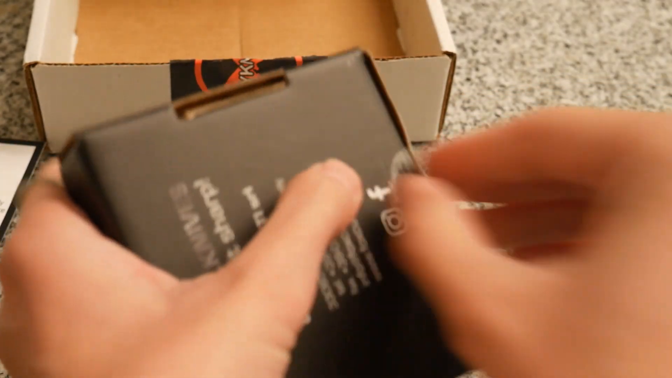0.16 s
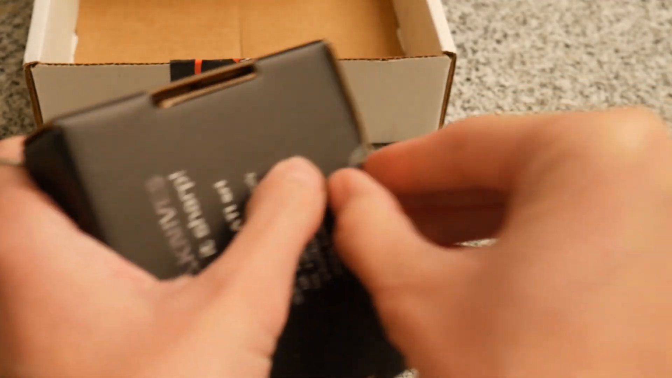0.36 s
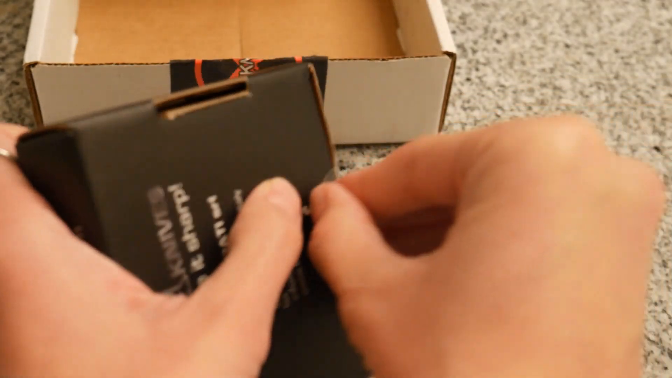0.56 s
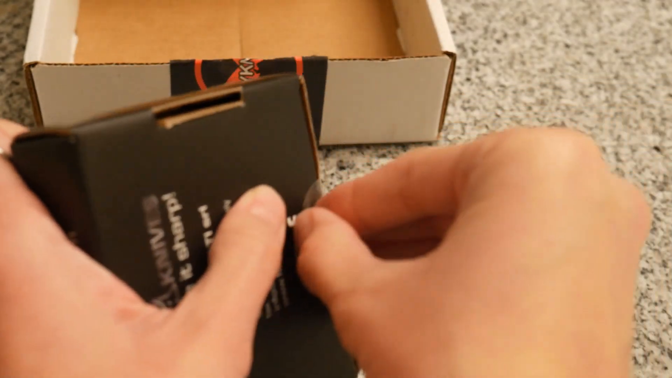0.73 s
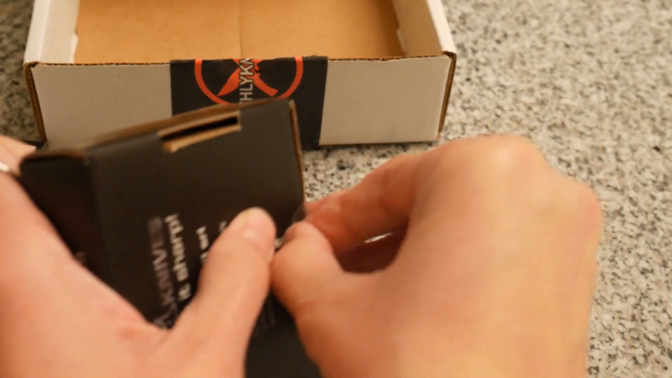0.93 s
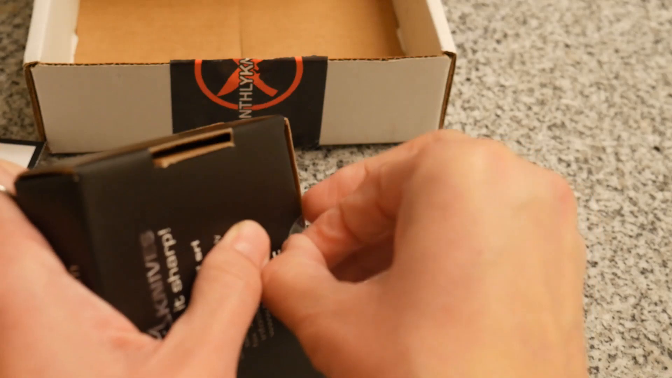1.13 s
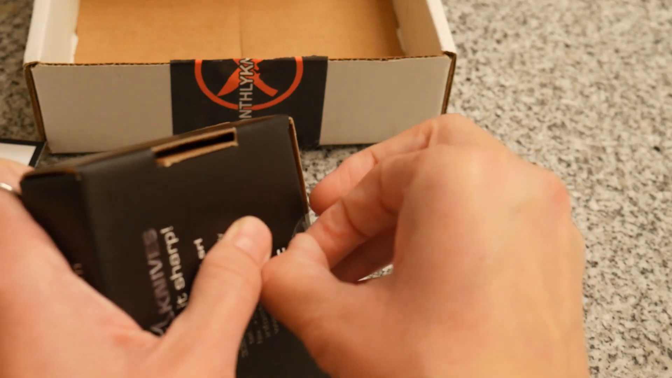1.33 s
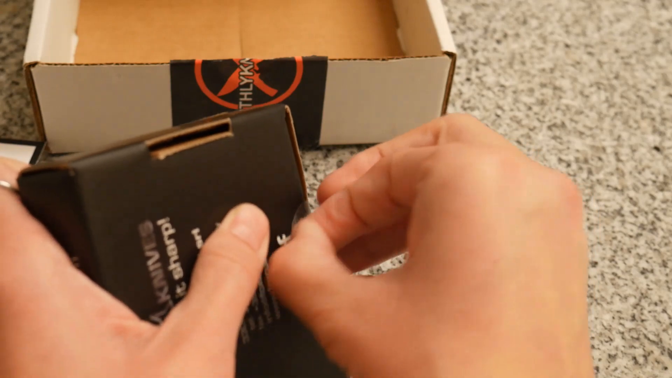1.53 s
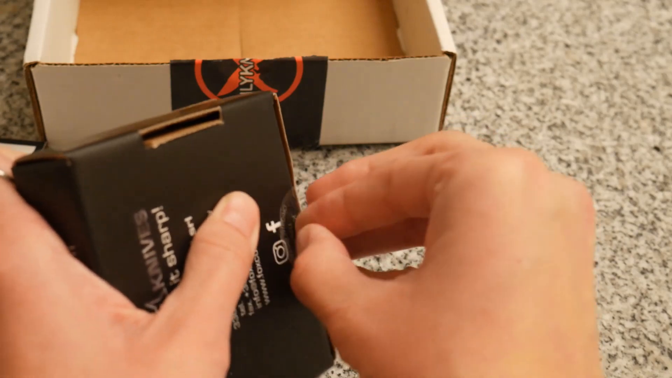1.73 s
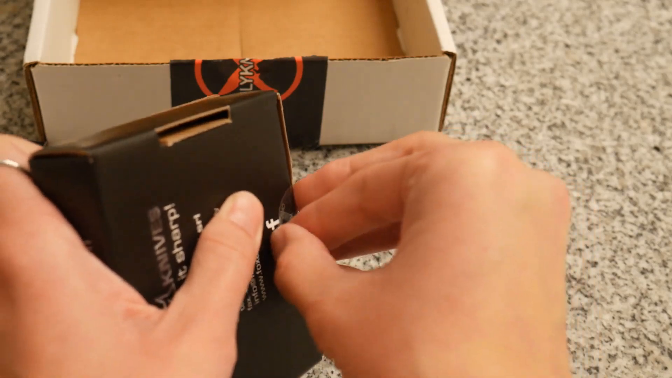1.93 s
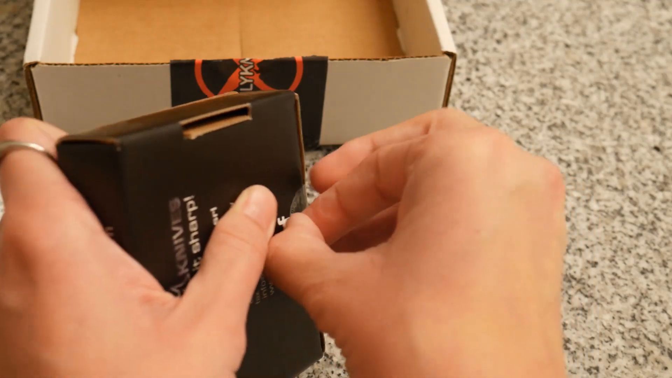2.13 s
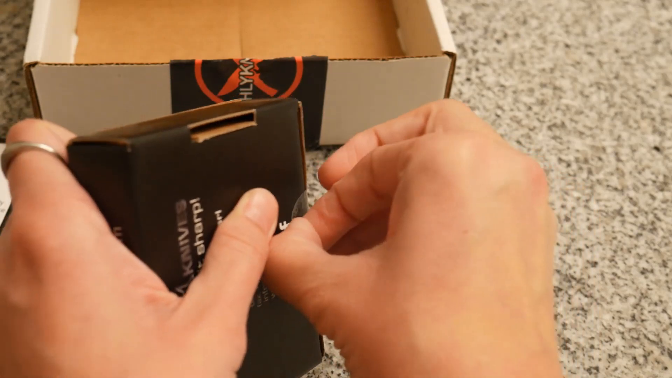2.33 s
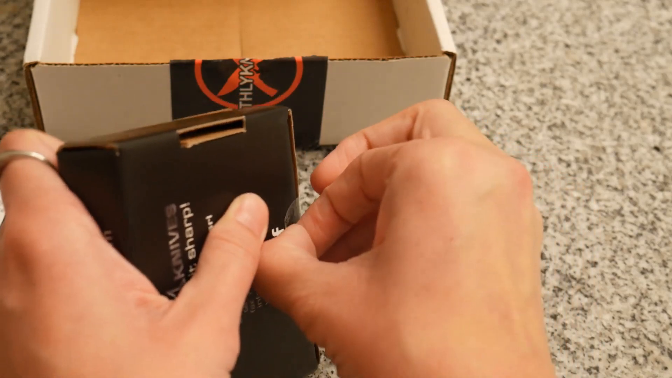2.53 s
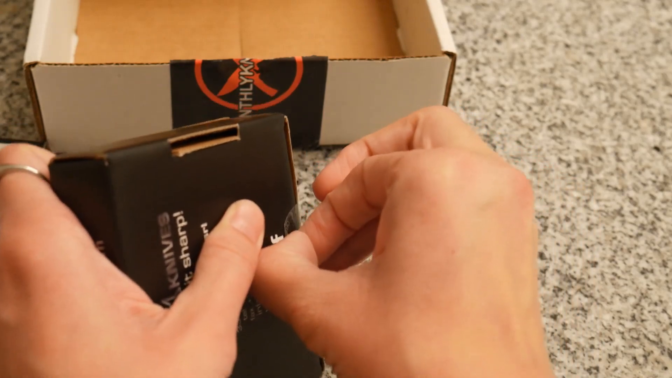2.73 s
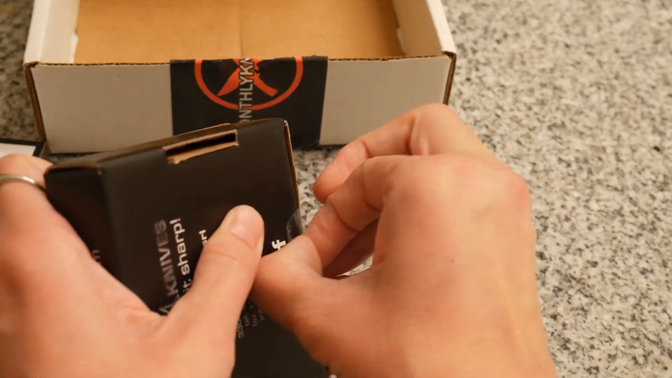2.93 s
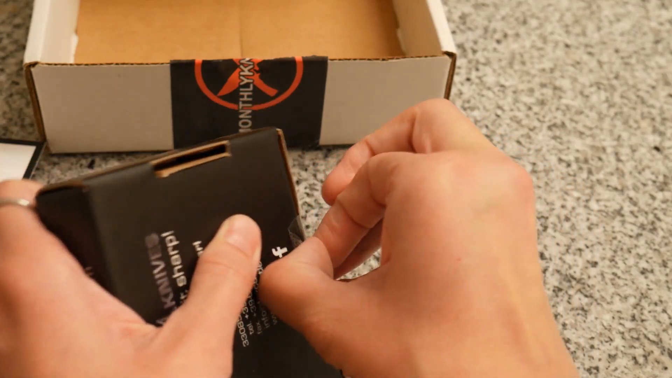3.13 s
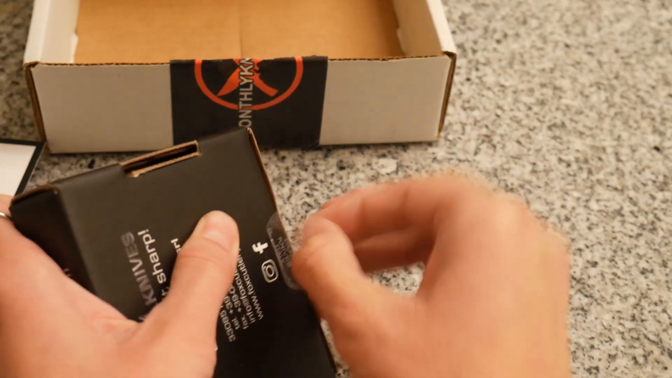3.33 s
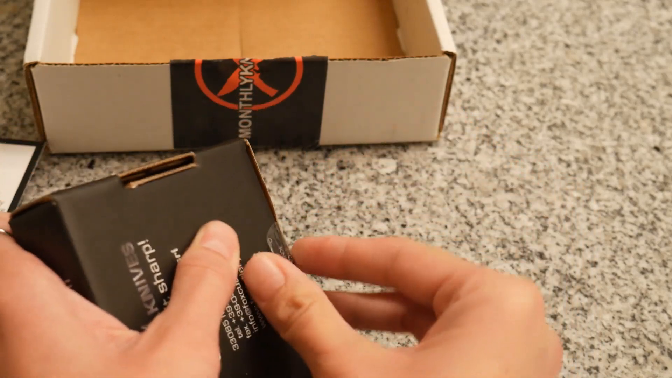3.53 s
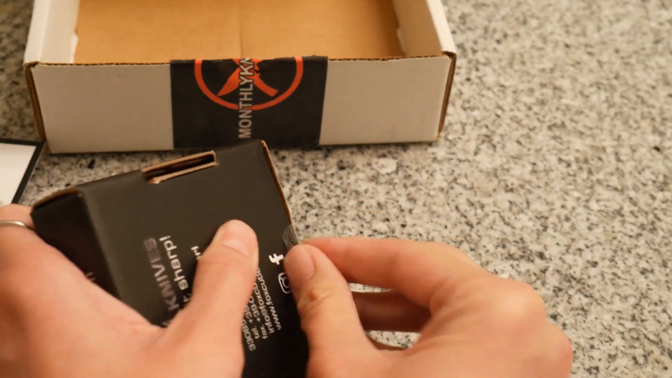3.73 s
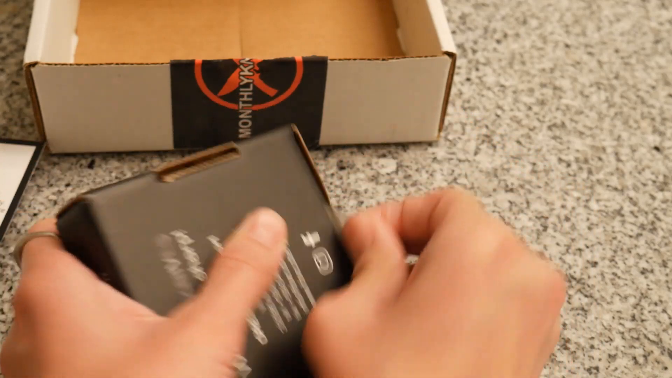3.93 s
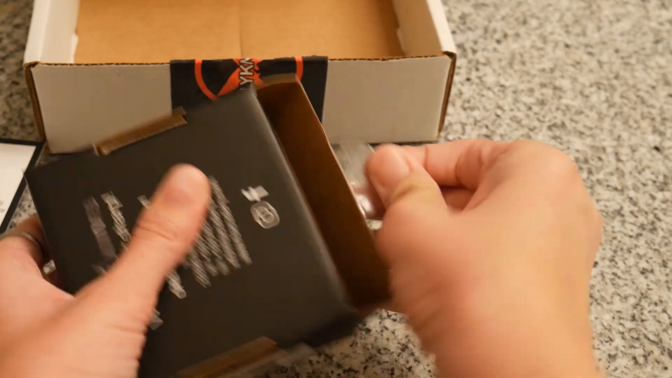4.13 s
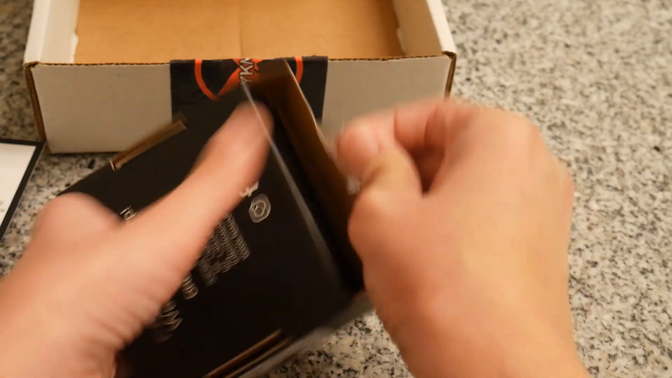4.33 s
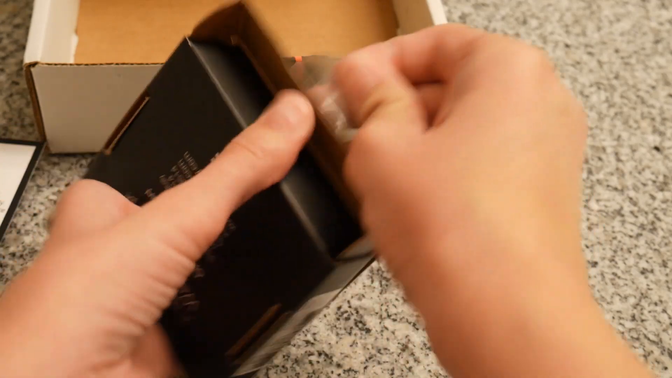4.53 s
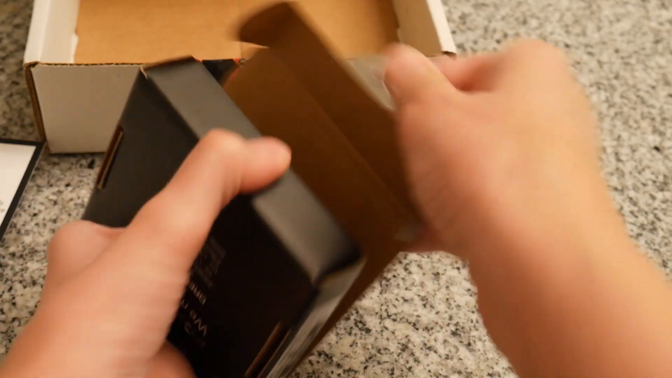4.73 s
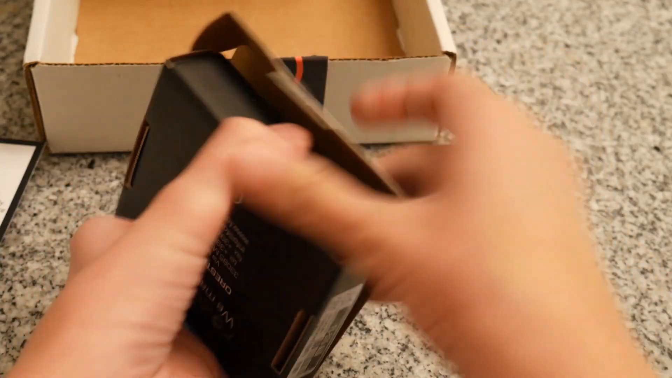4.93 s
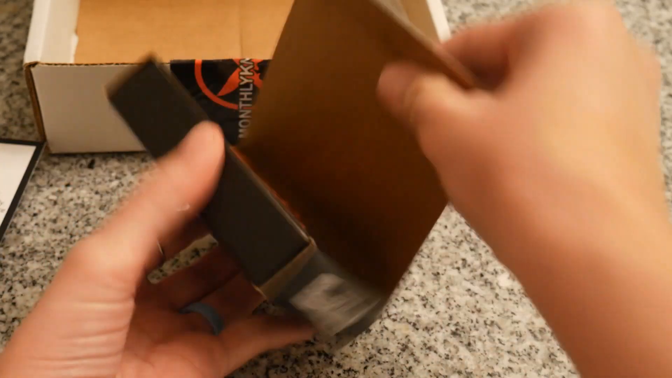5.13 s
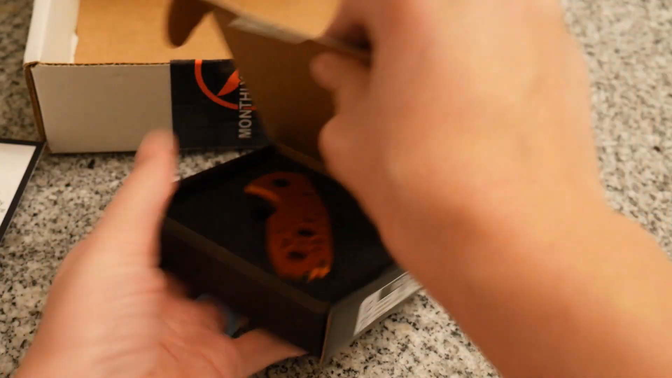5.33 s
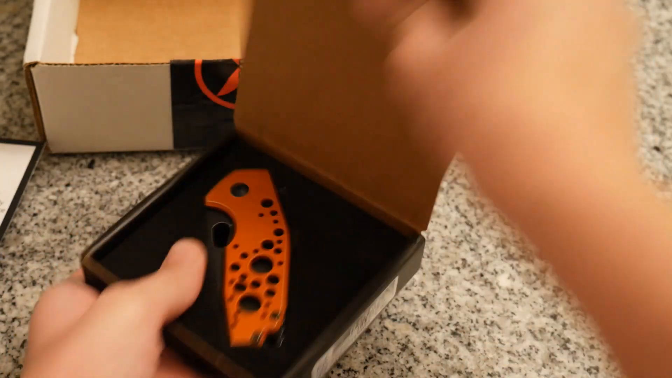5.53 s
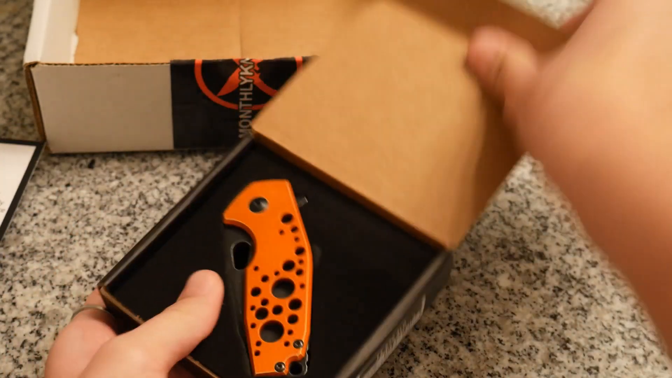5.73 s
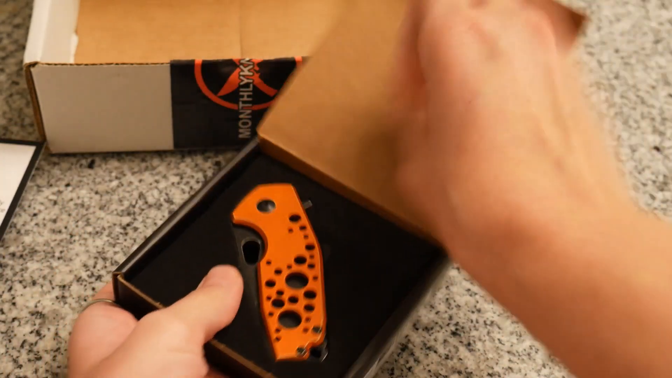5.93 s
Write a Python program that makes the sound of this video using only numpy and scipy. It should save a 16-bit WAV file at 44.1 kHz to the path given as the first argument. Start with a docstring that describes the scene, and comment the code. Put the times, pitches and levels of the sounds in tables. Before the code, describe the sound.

Fingers rub and pick at a small cardboard box's plastic seal, then the flap snaps loose and the lid scrapes open.

```python
"""In a small live room, close over a stone counter, hands work open a little cardboard box.
Fingertips rub and pick at its plastic seal: stick-slip friction rasps, hisses and creaks.
The flap pops out with sharp snaps and scrapes free, the hollow box knocks as it is turned over,
and the lid rasps as it is folded back. Contacts and rubbing are coloured by the resonances of the
card; the counter returns one early reflection and the room a short reverberation."""
import sys
import numpy as np
from scipy import signal
from scipy.fft import rfft, irfft, next_fast_len
from scipy.io import wavfile
from scipy.ndimage import uniform_filter1d

SR = 44100
rng = np.random.default_rng(int(sys.argv[2]) if len(sys.argv) > 2 else 0)


def dump(signal):
    """Clip the signal to [-1, 1] and save it as 16-bit WAV at the path in sys.argv[1]."""
    limited = np.clip(np.atleast_2d(signal).T, -1, 1)
    pcm = np.round(limited * 32767).astype(np.int16)
    wavfile.write(sys.argv[1], SR, pcm)


N = 267564
TIME = np.arange(N) / SR


def from_db(db):
    """Amplitude ratio of a level in decibels."""
    return 10 ** (np.asarray(db) / 20)


def unit_rms(x):
    """Normalisation to unit mean power."""
    return x / np.sqrt(np.mean(x ** 2) + 1e-20)


def at_hz(points, hz):
    """Interpolation of (frequency [Hz], value) points on a logarithmic frequency axis."""
    points = np.array(points)
    return np.interp(np.log(np.maximum(hz, 1)), np.log(points[:, 0]), points[:, 1])


def band(x, low_hz, high_hz, order=2):
    """Causal Butterworth band-pass filtering."""
    return signal.sosfilt(signal.butter(order, [low_hz, high_hz], "band", fs=SR, output="sos"), x)


def drift(knots_per_s):
    """Slow random modulation: linear interpolation between Gaussian values."""
    knots = rng.standard_normal(N // 20)
    return np.interp(TIME * knots_per_s, np.arange(len(knots)), knots)


def whiten(x, width_hz):
    """Spectral whitening: ripples broader than width_hz are levelled, the fine structure stays."""
    spectrum, size = rfft(x), x.shape[-1]
    power = uniform_filter1d(np.abs(spectrum) ** 2, max(1, int(width_hz * size / SR)), axis=-1)
    flat = irfft(spectrum / np.sqrt(np.maximum(power, 1e-12)), size)
    return flat * (np.arange(size) < size / 2)


def gliding_resonance(x, hz, relative_width, block=512):
    """A two-pole resonator of constant Q, retuned block by block."""
    out, state = np.zeros(N), np.zeros(2)
    for i in range(0, N, block):
        angle = 2 * np.pi * hz[i] / SR
        radius = np.exp(-relative_width * angle / 2)
        forward = (1 - radius ** 2) / 2 * np.array([1, 0, -1])
        feedback = [1, -2 * radius * np.cos(angle), radius ** 2]
        out[i:i + block], state = signal.lfilter(forward, feedback, x[i:i + block], zi=state)
    return out


def stereo_spectrum(correlation, size):
    """Partial coherence: the spectrum of two white noises mixed from a mid and a side signal."""
    alike = np.clip(at_hz(correlation, np.fft.rfftfreq(size, 1 / SR)), 0, 1)
    mid, side = rfft(rng.standard_normal((2, size)))
    return np.sqrt(1 + alike) * mid + np.sqrt(1 - alike) * side * [[1], [-1]]


def background(level_db=-63):
    """Stationary coloured noise: the murmur of the room and the hiss of the microphone."""
    # noise floor: (frequency [Hz], relative spectral density [dB])
    density = [(15, -48), (25, -18), (87, -20), (105, -5.5), (161, -7.5), (416, -9), (476, -14.5),
               (560, -14.5), (624, -13.5), (1740, -19.5), (2280, -18.5), (2690, -21.5), (7710, -26.5),
               (14800, -30.5), (16000, -48)]
    # its left-right likeness: (frequency [Hz], correlation [0-1])
    correlation = [(40, 0.6), (130, 0), (350, 0), (1500, 0), (8000, 0.34)]
    size = next_fast_len(N)
    colour = from_db(at_hz(density, np.fft.rfftfreq(size, 1 / SR)))
    noise = irfft(stereo_spectrum(correlation, size) * colour, size)[:, :N]
    return from_db(level_db) * unit_rms(noise)


def room(x, build_s=0.0029, late_s=0.148, late_db=-25, late_decay_s=0.006, size=32768):
    """Reverberation: reflections build up and decay exponentially; a faint cluster returns late."""
    # decay by band: (frequency [Hz], reverberation time [s], reflected level [dB])
    bands = [(130, 0.99, 0.5), (400, 0.33, 1), (1000, 0.24, -0.5), (2860, 0.26, -2.5), (7400, 0.28, -1),
             (13400, 0.16, -2)]
    # left-right likeness of the reflections: (frequency [Hz], correlation [0-1])
    correlation = [(120, 0), (260, 0.84), (500, 0.46), (1000, 0.36), (4000, 0.62), (12000, 0.38)]
    t = np.arange(size) / SR
    hz = np.fft.rfftfreq(size, 1 / SR)
    centres = np.array(bands)[:, 0]
    noise = irfft(stereo_spectrum(correlation, size), size)
    late = (t > late_s) * from_db(late_db) * np.exp(-np.abs(t - late_s) / late_decay_s)
    build = 1 - np.exp(-(t / build_s) ** 2)
    response = 0
    for (_, t60, db), share in zip(bands, np.eye(len(bands))):
        tail = whiten(noise * build * np.hypot(from_db(-60 * t / t60), late), width_hz=102)
        crossfade = at_hz(np.c_[centres, share], hz)
        response = response + from_db(db) * rfft(tail) * crossfade
    return signal.fftconvolve(x[None], irfft(response, size)[:, :size // 2], axes=1)[:, :N]


def counter_echo(x, delay_s=0.0088, echo_db=-13):
    """Specular reflection: the hard counter returns one delayed, weaker copy."""
    return from_db(echo_db) * np.interp(TIME - delay_s, TIME, x, left=0)


def box_body(x):
    """Resonance and antiresonance: the card filters each excitation with the same peaks and dips."""
    # response of the box and its card: (frequency [Hz], bandwidth [Hz], gain [dB])
    resonances = [(123.7, 22, 12.5), (268, 18, 5), (323, 36, 4), (403, 80, 3.5), (633, 160, 1.5),
                  (811, 220, 4.5), (966, 26, 6), (1070, 81, -1.5), (1240, 62, 0.5), (1270, 220, -2),
                  (1390, 6.6, 5), (1500, 15, 6), (1640, 22, 2), (1760, 180, -1.5), (2280, 180, 2),
                  (2844, 280, 4.5), (3080, 160, -0.5), (4340, 230, -1.5), (6100, 4800, 2.5), (7200, 220, 1),
                  (8100, 80, -1), (9730, 2300, 4.5), (14800, 6600, -4)]
    sections = []
    for hz, width_hz, db in resonances:
        damping, lift = np.pi * width_hz / SR, from_db(db / 2)
        tuning = -2 * np.cos(2 * np.pi * hz / SR)
        forward = [1 + damping * lift, tuning, 1 - damping * lift]
        feedback = [1 + damping / lift, tuning, 1 - damping / lift]
        sections.append(np.array(forward + feedback) / feedback[0])
    return signal.sosfilt(sections, x + 1e-18)


def shut_box(x, open_at_s=4.17, opening_s=0.15):
    """Enclosure resonance: the closed box adds a ring to every touch, fading as the flap comes out."""
    # modes of the closed box: (frequency [Hz], bandwidth [Hz], gain [dB])
    modes = [(437, 38, 0.5), (906, 28, 1), (1640, 28, -4), (2300, 140, -4)]
    drive = x * np.clip((open_at_s - TIME) / opening_s, 0, 1) + 1e-18
    return x + sum(from_db(db) * signal.lfilter(*signal.iirpeak(hz, hz / width_hz, fs=SR), drive)
                   for hz, width_hz, db in modes)


def squeaks():
    """Stick-slip oscillation: uneven slips lock loosely onto one resonance, swell and let go."""
    # creaks of skin, seal and card:
    # (start [s], duration [s], frequency [Hz], relative half-bandwidth [ratio], level [dB])
    creaks = [(0.374, 0.14, 830, 0.079, -58), (.42, 0.098, 2420, 0.25, -57),
              (0.901, 0.072, 3660, .08, -66.5), (1.03, .07, 4430, 0.075, -67.5),
              (1.152, .03, 5070, 0.24, -55.5), (1.783, 0.039, 2900, 0.13, -50.5),
              (2.854, 0.21, 2300, 0.054, -77), (3.657, 0.031, 1600, .05, -50),
              (3.692, 0.054, 1600, 0.048, -68), (4.217, 0.047, 3800, 0.18, -30.5),
              (4.68, 0.034, 5000, 0.074, -25), (4.83, .16, 1320, .17, -43), (5.789, 0.11, 1000, 0.37, -38),
              (6.016, 0.09, 1436, 0.054, -33.5)]
    out = np.zeros(N + SR)
    for start_s, length_s, hz, spread, db in creaks:
        at, span = int(start_s * SR), int(length_s * SR)
        slips = rng.standard_normal(SR // 2)
        tone = band(slips, hz / (1 + spread), hz * (1 + spread))[-span:]
        out[at:at + span] += from_db(db) * unit_rms(tone) * np.hanning(span)
    return out[:N]


def stroke_envelope(start_s, length_s, attack_share=0.34, release_s=0.01):
    """Amplitude envelope of a stroke: linear rise, hold, then exponential decay."""
    t = TIME - start_s
    rise = np.clip(t / (attack_share * length_s), 0, 1)
    return rise * np.exp(-np.clip((t - length_s) / release_s, 0, 20))


def hand_motion(firm_db=-44.5, expansion=1.29, pad_hz=950, pad_flex_db=-3, flex_db_per_octave=-31.5):
    """Incoherent sources add in power: grip and strokes set four friction gains and the rasp pitch."""
    # the holding hand flexes the box: (time [s], level before expansion [dB])
    grip_levels = [(0.0, -64), (0.25, -73), (0.44, -67.5), (0.89, -58), (1.21, -75), (2.07, -62.5),
                   (2.41, -94), (3.12, -89), (3.34, -68), (3.88, -64.5), (4.15, -55), (4.42, -51.5),
                   (4.84, -52.5), (5.35, -52), (5.59, -58.5), (5.81, -63), (5.94, -58), (6.06, -57)]
    # skin and card slide on the box: (start [s], duration [s], relative rasp level [dB],
    # rasp frequency [Hz], relative hiss level [dB], fine over coarse hiss [dB])
    strokes = [(0, 0.048, -65, 1470, -65, -9), (0.137, 0.038, -64.5, 1800, -61.5, -4),
               (0.374, 0.13, -53, 980, -59, -12), (0.717, 0.017, -58, 900, -61, -22),
               (0.786, 0.1, -64, 1000, -66, -19), (0.984, 0.15, -77, 1210, -67, -12),
               (1.146, 0.022, -64, 1490, -58, -5), (1.782, 0.022, -57.5, 1700, -50, -18),
               (1.875, 0.14, -58, 1100, -61, -15), (2.857, 0.22, -69, 1350, -65, -1),
               (2.965, 0.028, -65, 1370, -58, 8), (3.306, 0.062, -65, 1310, -62.5, 2),
               (3.44, .04, -55, 1100, -63.5, -7), (3.548, 0.1, -59, 1230, -54.5, -9),
               (3.629, 0.1, -53.5, 1640, -61.5, -9), (3.774, 0.15, -55, 1610, -49.5, -2),
               (3.93, 0.26, -50.5, 1000, -49.5, -1), (4.363, 0.04, -39.5, 1240, -34, -14),
               (4.417, .09, -44.5, 1320, -52, 1), (4.707, .055, -42, 1400, -37, -5),
               (4.824, 0.066, -46, 1500, -49, -2), (4.904, 0.077, -46, 1500, -42, -1),
               (4.928, .24, -55, 1550, -47.5, 0.5), (5.373, 0.18, -57.5, 1420, -56, -5),
               (5.546, 0.11, -60, 1420, -47.5, 3), (5.741, 0.026, -43, 1270, -44.5, -2),
               (5.781, 0.11, -38, 1320, -43.5, -5), (5.864, 0.041, -34.5, 1230, -32, -6),
               (5.899, 0.12, -51, 1250, -47.5, -5.5), (6.019, 0.093, -42.5, 1380, -43, -4)]
    grip_db = np.interp(TIME, *np.transpose(grip_levels))
    grip = from_db(firm_db + expansion * (grip_db - firm_db))
    moves = [(grip, -3, 1250, -3, -8)]  # the gripping skin creeps on the card all the while
    moves += [(stroke_envelope(start_s, length_s), *colour) for start_s, length_s, *colour in strokes]
    flex = grip ** 2
    rasp = weighted_hz = coarse = fine = 0
    for envelope, rasp_db, hz, hiss_db, bright_db in moves:
        rasp_power = (envelope * from_db(rasp_db)) ** 2
        hiss_power = (envelope * from_db(hiss_db)) ** 2
        # a flat finger pad rasps low and flexes the box; an edge rasps high and hardly flexes it
        flex += rasp_power * from_db(pad_flex_db + flex_db_per_octave * np.log2(hz / pad_hz)) ** 2
        rasp += rasp_power
        weighted_hz += rasp_power * hz
        coarse_share = 1 / (1 + from_db(bright_db) ** 2)
        coarse += hiss_power * coarse_share
        fine += hiss_power * (1 - coarse_share)
    return np.sqrt(flex), np.sqrt(rasp), np.sqrt(coarse), np.sqrt(fine), weighted_hz / rasp


def friction(slips_per_s, spread_db, judder_db, judder_per_s):
    """Shot noise: fibres catch and slip at random, with uneven strength, and shake the box."""
    slips = (rng.random(N) < slips_per_s / SR) * rng.standard_normal(N)
    strength_db = spread_db * rng.standard_normal(N) + judder_db * drift(judder_per_s)
    return box_body(slips * from_db(strength_db))


def rubbing(flex_db=-4, sway_db=-15, rasp_db=-1, hiss_db=-2.5):
    """Sliding friction forces vibration: the box flexes, its panels rasp, its surface hisses."""
    flex_gain, rasp_gain, coarse_gain, fine_gain, rasp_hz = hand_motion()
    # shifting fingers give the box separate little bumps
    bumps = friction(slips_per_s=260, spread_db=1.7, judder_db=3.5, judder_per_s=45)
    hollow = unit_rms(band(bumps, 216, 533) + from_db(sway_db) * band(bumps, 82, 110))
    # the grip and the place of contact set the pitch of the panel
    scrape = band(friction(3000, 0.63, 3.5, 130), 690, 3380, order=3)
    panels = unit_rms(gliding_resonance(scrape, rasp_hz, relative_width=0.64))
    coarse = unit_rms(band(friction(14000, 2.4, 1.6, 170), 2150, 6500))
    fine = unit_rms(band(friction(20000, 2, 1.5, 170), 6000, 13000))
    return (from_db(flex_db) * flex_gain * hollow
            + from_db(rasp_db) * rasp_gain * panels
            + from_db(hiss_db) * (coarse_gain * coarse + fine_gain * fine))


def knocks_and_scrapes(click_hz=3100, edge_over_click_db=-4.5, send_db=-3.5):
    """Transient excitation: knocks and short crunchy scrapes of fingers and flap on the box, as events."""
    # knocks and scrapes, in relative levels: (time [s], crunch decay [s], panel level [dB],
    # panel frequency [Hz], thump level [dB], click level [dB])
    contacts = [(0.1466, .002, -60, 1730, -67, -59), (0.26, .0008, -53.5, 890, -54.5, -64),
                (0.282, 0.0025, -53.5, 870, -51.5, -63), (.718, .0039, -49.5, 860, -47.5, -63),
                (1.429, 0.0024, -61, 1120, -57.5, -74), (1.6939, 0.0073, -48.5, 1620, -68, -67),
                (1.807, 0.0024, -44, 1760, -59, -57), (1.847, 0.0017, -53, 1190, -55, -73),
                (2.0481, 0.0086, -52, 1390, -54, -55), (2.2063, 0.0057, -49.5, 950, -55, -53.5),
                (3.1984, 0.014, -35.5, 1250, -46.5, -39), (3.2025, 0.0045, -37, 950, -48, -41.5),
                (3.4828, 0.0012, -38, 870, -47, -54), (4.0, 0.009, -25.5, 1450, -38.5, -41),
                (4.194, .004, -53, 1000, -41.5, -64), (4.2306, 0.0013, -32, 1220, -48, -37),
                (4.317, 0.0054, -38, 1000, -31, -50), (4.425, 0.0068, -32, 1070, -31, -34.5),
                (4.529, 0.0063, -41.5, 1540, -38, -39.5), (4.6524, 0.016, -47, 1420, -60, -40),
                (4.7332, 0.0049, -24.5, 1390, -30.5, -26), (4.744, 0.0064, -23.5, 1550, -50, -29.5),
                (5.147, 0.0017, -46, 1140, -37.5, -67), (5.181, .007, -22.5, 1450, -24.5, -44),
                (5.253, 0.0092, -41.5, 1550, -51, -46.5), (5.356, 0.0037, -56, 1350, -44, -59),
                (5.445, 0.013, -71, 1180, -43, -62), (5.482, .016, -52, 1600, -46, -57),
                (5.757, 0.012, -37.5, 1250, -66, -47.5), (5.8844, 0.0097, -23, 1200, -41.5, -45),
                (6.0603, 0.0078, -32.5, 1370, -61, -35)]
    return [(s, crunch_s, thump_db, panel_db, panel_hz,
             click_db, click_hz, click_db + edge_over_click_db, send_db)
            for s, crunch_s, panel_db, panel_hz, thump_db, click_db in contacts]


def snaps(thump_over_click_db=-28, panel_over_click_db=-19.5, panel_hz=1350):
    """Release of elastic energy: the seal and card edges let go. Returns events for transients()."""
    # releases, in relative levels: (time [s], crunch decay [s], click level [dB],
    # click frequency [Hz], edge crack level [dB], room send [dB])
    releases = [(1.5068, 0.0014, -42.5, 6400, -45.5, -1.5), (1.5265, 0.0019, -37, 6850, -40, 2.5),
                (1.548, 0.0014, -25, 3930, -35, -3), (1.9998, 0.0031, -39, 4480, -43.5, -2),
                (3.2036, 0.00027, -27.5, 3560, -55, -7), (3.936, .004, -42, 3980, -40, -12),
                (3.9406, 0.0037, -23, 4430, -21.5, -4), (3.9962, 0.0022, -10.5, 4620, -14.5, -20),
                (4.0, 0.0019, -28, 4660, -20, 1.5), (4.006, 0.0014, -25, 4840, -34, 8.5),
                (4.2104, .003, -29, 4200, -43.5, 1.5), (4.2314, 0.0024, -27, 4200, -22, -0.5),
                (4.3524, 0.0011, -25, 4400, -26.5, -2), (4.3766, 0.002, -26, 4260, -27, -2),
                (4.385, 0.0017, -17, 4970, -51, -5), (4.485, 0.0049, -32.5, 4100, -40, 3),
                (4.688, 0.0011, -14, 5230, -19, -2.5)]
    return [(s, crunch_s, click_db + thump_over_click_db, click_db + panel_over_click_db, panel_hz,
             click_db, click_hz, edge_db, send_db)
            for s, crunch_s, click_db, click_hz, edge_db, send_db in releases]


def transients(events, panel_lag_s=0.0012, panel_ratio=1.422, click_ratio=1.594, size=4096):
    """Impulse response: a pulse and a brief crunch excite the box. Returns direct sound and room send."""
    direct, send = np.zeros((2, N + size))
    t = np.arange(size) / SR
    impulse = t == 0
    attack = int(0.008 * SR)  # each part's level is its rms over this onset
    for s, crunch_s, thump_db, panel_db, panel_hz, click_db, click_hz, edge_db, send_db in events:
        edge_crunch = from_db(-10) * rng.standard_normal(size) * np.exp(-t / crunch_s)
        # the broad panels go on shaking longer than the stiff edges
        panel_crunch = from_db(-15) * rng.standard_normal(size) * np.exp(-t / (crunch_s + panel_lag_s))
        stiff = box_body(whiten(impulse + edge_crunch, width_hz=1060))
        slack = box_body(whiten(impulse + panel_crunch, width_hz=200))
        thump = band(slack, 228, 545) + from_db(-17) * band(slack, 67, 140, order=3)
        panel = band(slack, panel_hz / panel_ratio, panel_hz * panel_ratio)
        click = band(stiff, click_hz / click_ratio, click_hz * click_ratio, order=3)
        edge = band(stiff, 7300, 13300)
        parts = [(thump_db - 1, thump), (panel_db, panel), (click_db, click), (edge_db, edge)]
        burst = sum(from_db(db) * part / np.sqrt(np.mean(part[:attack] ** 2)) for db, part in parts)
        at = int(s * SR)
        direct[at:at + size] += burst
        send[at:at + size] += burst * from_db(send_db)
    return direct[:N], send[:N]


def scene(burst_db=-4, burst_room_db=-2, slide_room_db=-1):
    """Superposition: direct sound from the box straight ahead, with the room's reflections all round."""
    bursts, send = transients(snaps() + knocks_and_scrapes())
    slides = rubbing() + squeaks()
    direct = shut_box(from_db(burst_db) * bursts + slides)
    reflected = room(shut_box(from_db(burst_room_db) * send + from_db(slide_room_db) * slides))
    return direct + counter_echo(direct) + reflected + background()


def record(dry):
    """Soft saturation rounds the highest peaks; a steep low-pass filter cuts the top of the treble."""
    ceiling, cutoff_hz = 0.88, 16000
    rounded = dry / (1 + np.abs(dry / ceiling) ** 6) ** (1 / 6)
    return signal.sosfilt(signal.ellip(12, 0.1, 105, cutoff_hz, fs=SR, output="sos"), rounded)


dry = scene()
out = record(dry)
dump(out)
```